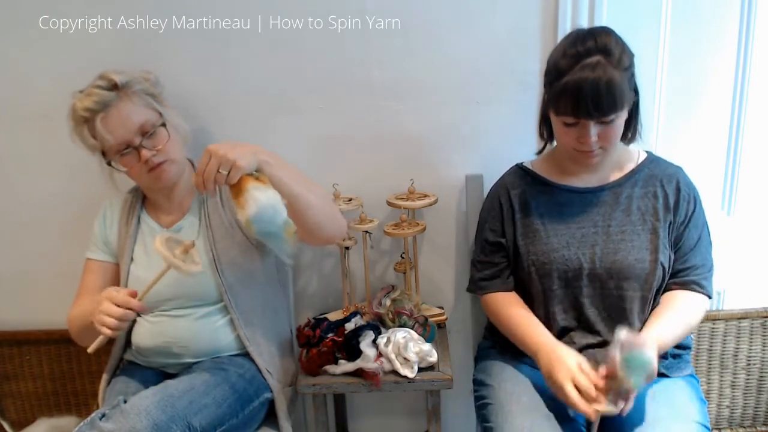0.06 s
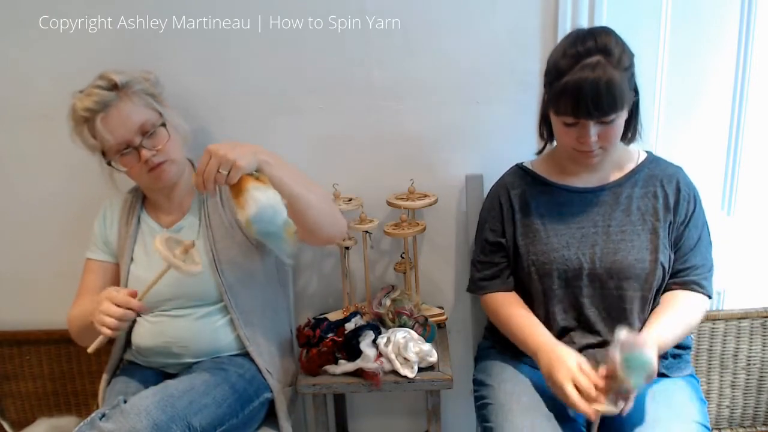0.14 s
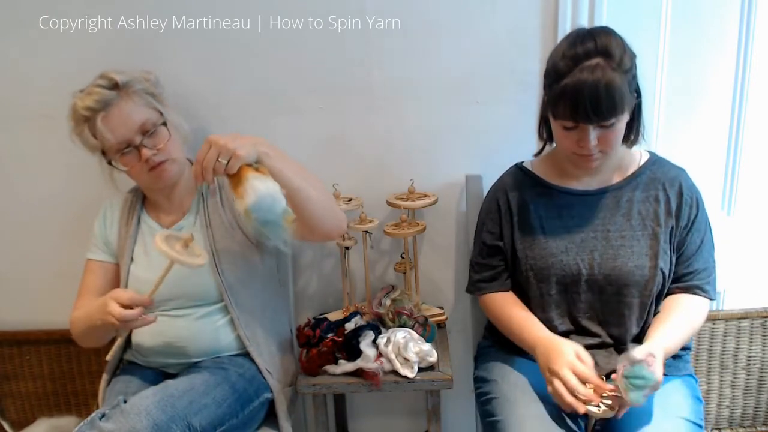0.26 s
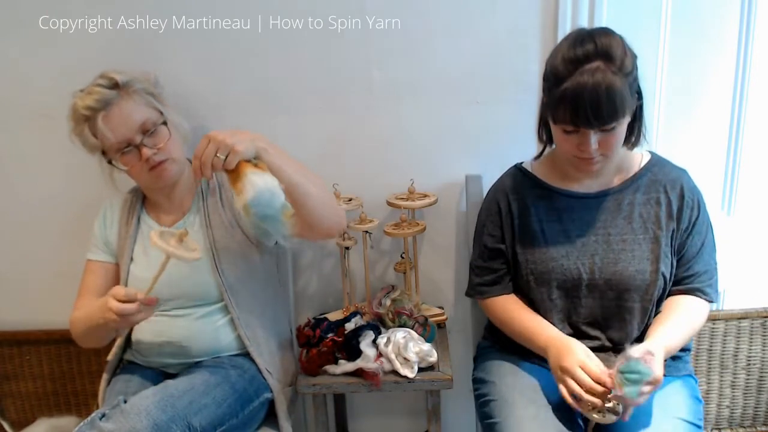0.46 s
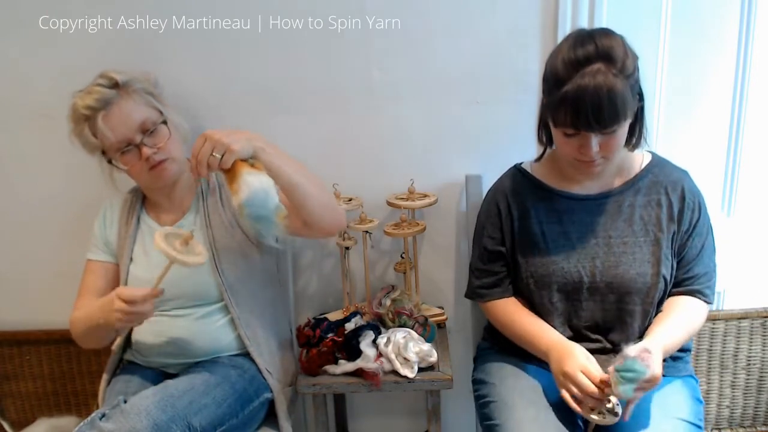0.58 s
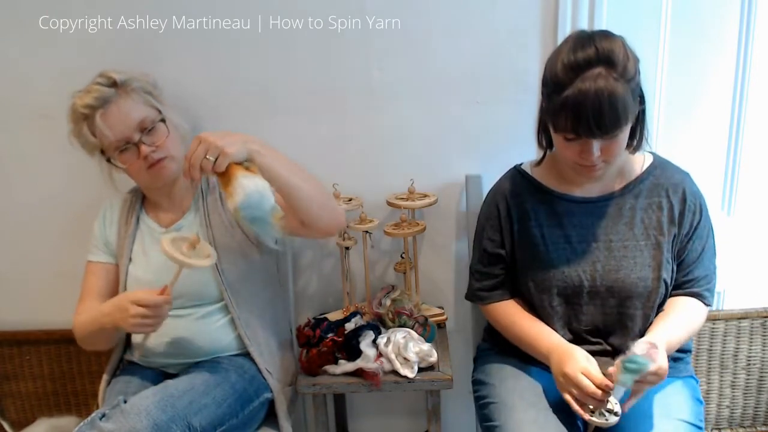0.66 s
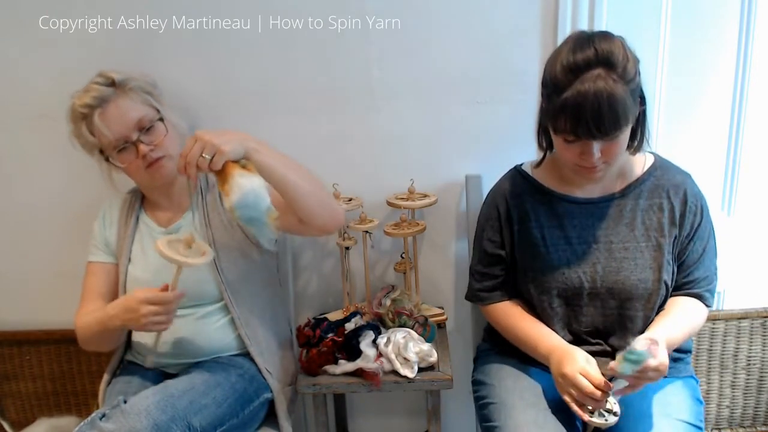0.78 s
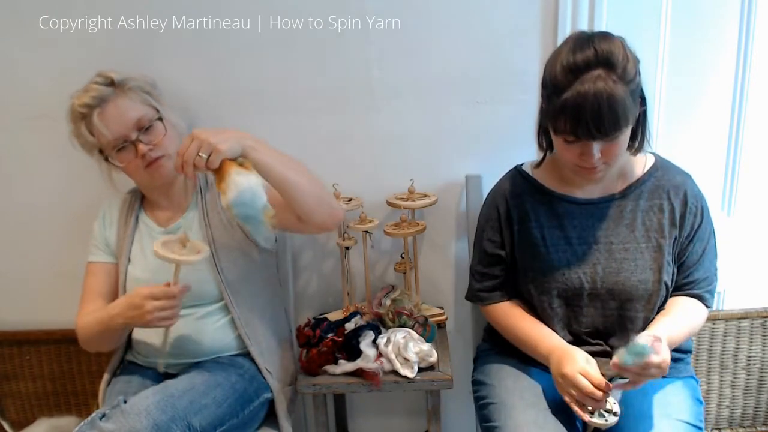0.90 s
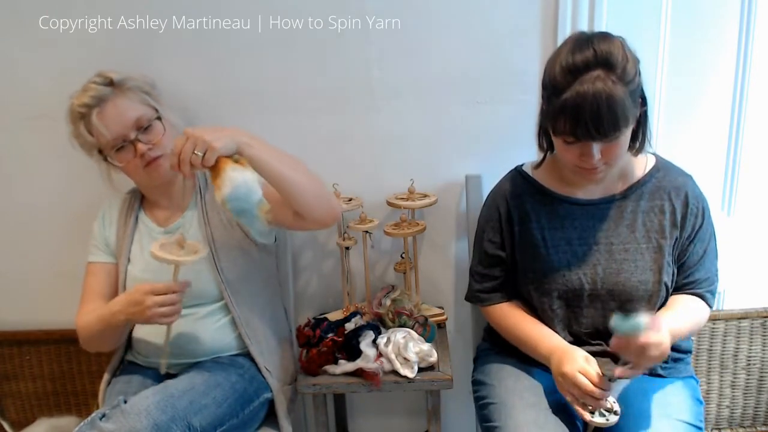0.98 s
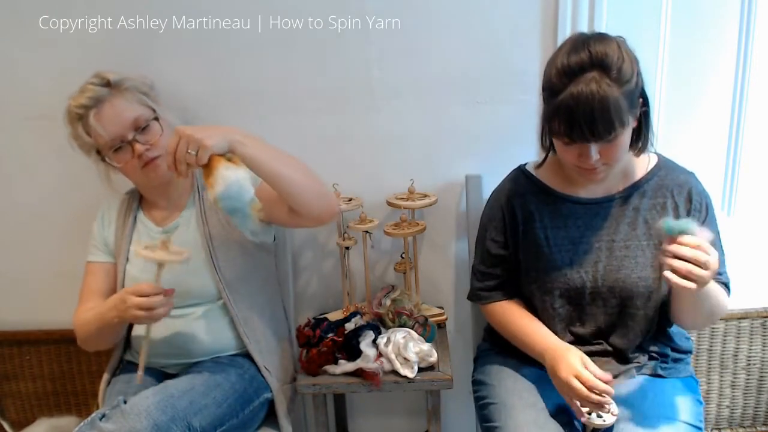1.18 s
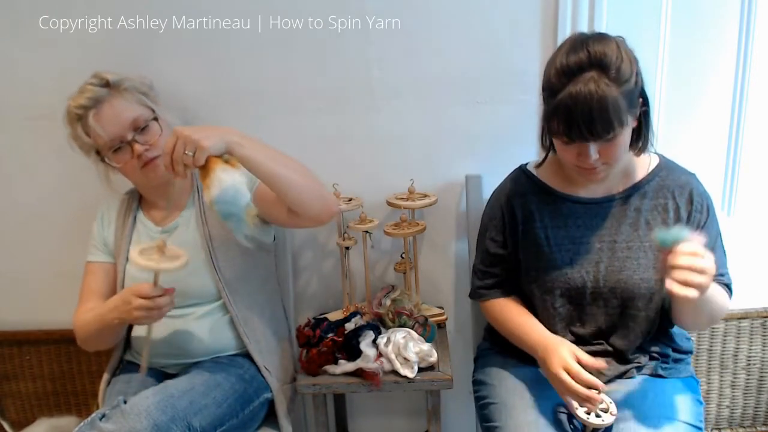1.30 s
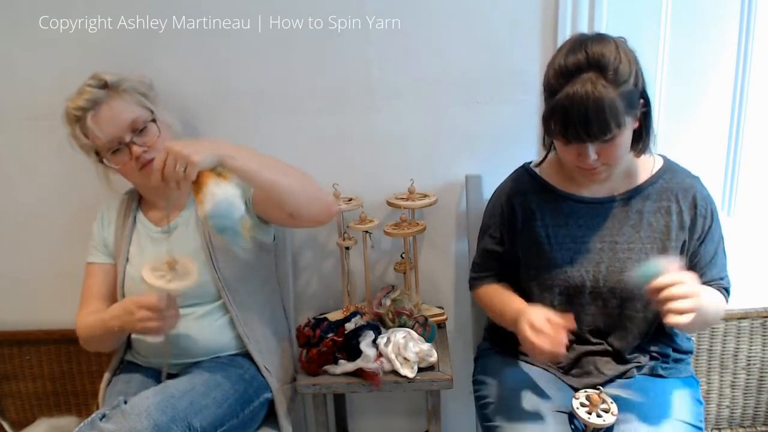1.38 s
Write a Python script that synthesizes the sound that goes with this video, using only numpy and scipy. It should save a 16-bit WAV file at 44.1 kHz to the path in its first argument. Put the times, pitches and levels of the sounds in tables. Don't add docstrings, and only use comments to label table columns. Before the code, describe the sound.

Low seat bumps lead into a sharp wooden knock with a short boxy room tail, followed by quiet rustling and small bumps, then a weaker, darker thud, over soft room air and faint fan hum.

```python
import sys
import numpy as np
from scipy import signal
from scipy.io import wavfile
from scipy.ndimage import uniform_filter1d

SR = 44100
rng = np.random.default_rng(int(sys.argv[2]) if len(sys.argv) > 2 else 0)


def persist_wave(psi):
    counts = np.round(np.clip(psi, -1, 1) * 32767).astype(np.int16)
    wavfile.write(sys.argv[1], SR, np.atleast_2d(counts).T)


def volts(x):
    e = np.asarray(x, float) / 20
    return 10 ** e


N = 63945
T = np.arange(N) / SR


def band(x, hz, width_hz):
    edges = [max(hz - width_hz / 2, 20), hz + width_hz / 2]
    sos = signal.butter(2, edges, "band", fs=SR, output="sos")
    return signal.sosfilt(np.vstack([sos, sos]), np.tile(x, 2))[len(x):]


def unit(x):
    return x / np.sqrt(np.mean(x ** 2))


def walk(rate):
    k = int(SR / rate)
    steps = np.repeat(rng.standard_normal(N // k + 1), k)
    return unit(uniform_filter1d(uniform_filter1d(steps, k), k)[:N])


def room_air():
    # f/Hz, level/dB per Hz
    air_spectrum = [(40, -30), (80, -12.5), (150, 0), (300, -15), (700, -19), (1400, -26), (3000, -32),
                    (7000, -36.5)]
    hz_points, db_points = np.array(air_spectrum).T
    noise, swell = 0, walk(12)
    for hz in 45 * 2 ** np.arange(0, 7.4, 1 / 3):
        density_db = np.interp(np.log(hz), np.log(hz_points), db_points)
        db = density_db + 10 * np.log10(hz) + 1.0 * swell + 3.7 * walk(6)
        noise = noise + volts(db) * unit(band(rng.standard_normal(N), hz, hz / 4))
    return volts(-69) * unit(noise)


def fan():
    # f/Hz, rms level/dB
    fan_tones = [(457.6, -88.5), (845.2, -81.5), (1389, -97), (1787, -93.5)]
    width_hz = 18
    hum = 0
    for hz, db in fan_tones:
        hum = hum + volts(db + 1.5 * walk(6)) * unit(band(rng.standard_normal(N), hz, width_hz))
    return hum


def background():
    # t/s, gain/dB
    gate_open = [(0, -4), (.1, 0), (.3, 2), (.45, 0), (.55, 1), (.8, 2), (.88, -1), (1.05, 0), (1.2, -2),
                 (1.45, -3)]
    return volts(np.interp(T, *np.array(gate_open).T)) * (room_air() + fan())


def rustles():
    # t/s, level/dB,
    # length/s, centre f/Hz, bandwidth/Hz
    rustle_events = [(.01, -82, 0.045, 5470, 510), (0.029, -58.5, 0.081, 188, 240),
                     (0.133, -57.5, 0.046, 422, 341), (.1955, -54.5, .011, 2400, 3000),
                     (0.195, -40, .012, 490.8, 700), (0.346, -67.5, 0.069, 173.5, 121.5),
                     (0.47, -76, 0.051, 502, 300), (.705, -62, 0.061, 190, 150),
                     (0.789, -65.5, 0.068, 196.6, 150), (0.12, -77, 0.089, 3000, 4000),
                     (0.133, -74.5, 0.0093, 1592, 198.7), (0.613, -59, .016, 4400, 550),
                     (.615, -74.5, .015, 5400, 900), (.616, -68, .034, 3550, 600),
                     (.618, -77.5, 0.065, 4750, 1500), (0.615, -74.5, 0.042, 1560, 1500),
                     (0.711, -76, 0.023, 4070, 1478), (.715, -76.5, 0.045, 1450, 1570),
                     (0.926, -83.5, 0.072, 4245, 1969), (.99, -80, .075, 4400, 3400),
                     (0.28, -60, .05, 95, 50), (1.077, -58, .05, 95, 50), (.138, -57, .012, 620, 250),
                     (1.056, -72, .028, 2150, 650)]
    grain_db, sag_db, release_s = 3, 4, .011
    out = 0
    for start, db, length, hz, width_hz in rustle_events:
        since = T - start
        attack = np.clip(since / (.0015 + 2.5 * length ** 2), 0, 1)
        sag = volts(-sag_db * np.clip(since / length, 0, 1))
        release = np.exp(-np.maximum(since - length, 0) / release_s)
        grain = volts(db + grain_db * walk(170))
        out = out + grain * attack * sag * release * unit(band(rng.standard_normal(N), hz, width_hz))
    return out


def burst(t, hz, cycles):
    return np.cos(2 * np.pi * hz * t) * np.exp(-(2 * t * hz / cycles) ** 2)


def bumps():
    # centre t/s, peak level/dB, f/Hz, cycles
    bump_events = [(.058, -42, 194, 0.97), (.072, -50, 171, 3.6), (.088, -51.5, 135, 1.4),
                   (.115, -26, 112.8, 1.74), (.134, -34, 247, 1.56), (.146, -38.5, 330, 2.4),
                   (.160, -31, 150, 1.5), (.170, -31.5, 121, 1.2), (.188, -39.5, 160, 2),
                   (.405, -68, 87, 4), (.478, -36, 93.1, 1.48), (.493, -48, 100, 1.53),
                   (.525, -49, 116, 8.8), (.581, -40.5, 188, 1.35), (.593, -37.5, 179.4, 1.13),
                   (.608, -53.5, 200, 3), (.622, -58, 714, 6.7), (.673, -55, 132, 1.5),
                   (.723, -48.5, 696, 4.3), (.733, -43.5, 713, 3.4), (.746, -51, 200, 2),
                   (.752, -58, 430, 6), (.035, -54, 110, 3), (.748, -53.5, 640, 7.3),
                   (.760, -53, 197, 1.73), (.821, -41, 104.5, 2.16), (.85, -56.5, 176.4, 2.83),
                   (.94, -64, 149.4, 4.5), (1.335, -67, 97.2, 5.1), (1.432, -54, 178, 3.16)]
    return sum(volts(db) * burst(T - centre, hz, cycles) for centre, db, hz, cycles in bump_events)


def wood_echoes(t):
    # delay t/s, level/dB, f/Hz, cycles
    echoes = [(.0028, -10, 380, 3), (0, -2, 735, 2.2), (.0082, -1.5, 285, 2.6), (.0082, -6, 704, 1.7),
              (.0128, -7, 660, 2.8), (0.0225, -10, 480, 2), (0.026, -11, 640, 2.6), (0.0336, -6, 640, 1.3),
              (.0505, -18, 400, 2.3)]
    return sum(volts(db) * burst(t - delay, hz, cycles) for delay, db, hz, cycles in echoes)


def room_modes(t):
    # f/Hz, level/dB, decay time t60/s
    modes = [(147.2, -13, 0.27), (173.5, -16, 0.4), (222.5, -7.5, 0.29), (276.2, -2.5, 0.14),
             (300.4, 0, 0.17), (353, -2, .17), (367.7, -13.5, 0.27), (456, -3, .16), (512.3, -3, 0.16),
             (560, -1, .12), (633, -4.5, 0.11), (724, -8.5, .13), (785, -5.5, .11), (851, -15, 0.18)]
    wobble_db = 2
    t = np.maximum(t, 0)
    out = 0
    for hz, db, t60 in modes:
        decay_db = db + wobble_db * walk(45)[:len(t)] - 60 * t / t60
        out = out + volts(decay_db) * np.sin(2 * np.pi * hz * t)
    return out


def diffuse_tails(on):
    # f/Hz, level/dB, decay time t60/s
    tail_bands = [(330, -18, .19), (650, -18, 0.21), (1150, -8, 0.27), (1780, -13, 0.22),
                  (2400, -12.5, .16), (3200, -12.5, 0.12), (4400, -20.5, .13), (5750, -12, .085)]
    tails = []
    for hz, db, t60 in tail_bands:
        noise = unit(band(rng.standard_normal(len(on)), hz, hz / 3))
        tails.append(volts(db) * noise * volts(-60 * on / t60))
    return tails


def blows():
    # t/s, level/dB, contact time/ms, crack level/dB, treble cut f/Hz
    blow_events = [
        (0.2069, -5, 0.25, -25, 1600),
        (1.0530, -13, .5, -62.5, 560),
    ]
    lead_s, build_s, room_start_s, room_db = .01, 0.02, .0078, -4.5
    gate_s, gate_db_per_s = 0.11, 292.5
    treble_gate_s, treble_gate_db_per_s = 0.052, 246
    bass_cut_hz = 105
    t, out = T[:SR // 2] - lead_s, np.zeros(N)
    on = np.maximum(t, 0)
    build = 1 - np.exp(-(on / build_s) ** 2)
    room = volts(room_db) * room_modes(t - room_start_s) * build
    gate = volts(-gate_db_per_s * np.maximum(t - gate_s, 0))
    treble_gate = volts(-treble_gate_db_per_s * np.maximum(t - treble_gate_s, 0))
    wood = wood_echoes(t)
    for start, db, contact_ms, crack_db, cut_hz in blow_events:
        tails = diffuse_tails(on)
        push = np.exp(-((T[:300] * 1000 - 2 * contact_ms) / contact_ms) ** 2 * 2)
        low = np.convolve(wood + room + build * sum(tails[:2]), push / push.sum())[:len(t)]
        body_band = signal.butter(2, [bass_cut_hz, cut_hz], "band", fs=SR, output="sos")
        low = signal.sosfiltfilt(body_band, low)
        crack = volts(crack_db + 7.5) * sum(tails[2:]) * (1 - np.exp(-on / .0004)) * treble_gate
        i = int((start - lead_s) * SR)
        n = min(len(t), N - i)
        out[i:i + n] += (volts(db) * gate * (low + crack))[:n]
    return out


def scene():
    return (background() + rustles() + bumps() + blows())[None]


def band_limit(x):
    return signal.sosfilt(signal.butter(12, 15500, fs=SR, output="sos"), x)


def record(dry):
    limit, top_hz, hiss_db, hiss_top_hz = .95, 6450, -99.5, 15600
    limited = limit * np.tanh(dry / limit)
    voice_band = signal.cheby2(10, 70, top_hz * 1.277, fs=SR, output="sos")
    x = signal.sosfilt(voice_band, limited)
    hiss_band = signal.ellip(8, .2, 60, hiss_top_hz, fs=SR, output="sos")
    hiss = signal.sosfilt(hiss_band, rng.standard_normal(x.shape))
    return band_limit(x + volts(hiss_db) * hiss)


dry = scene()
out = record(dry)
persist_wave(out)
```